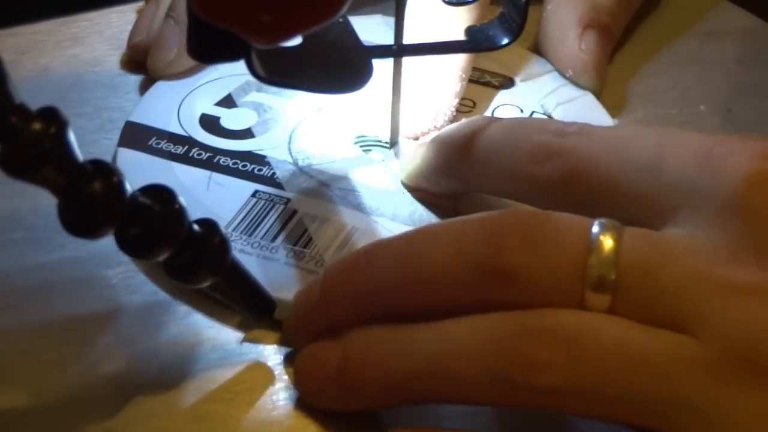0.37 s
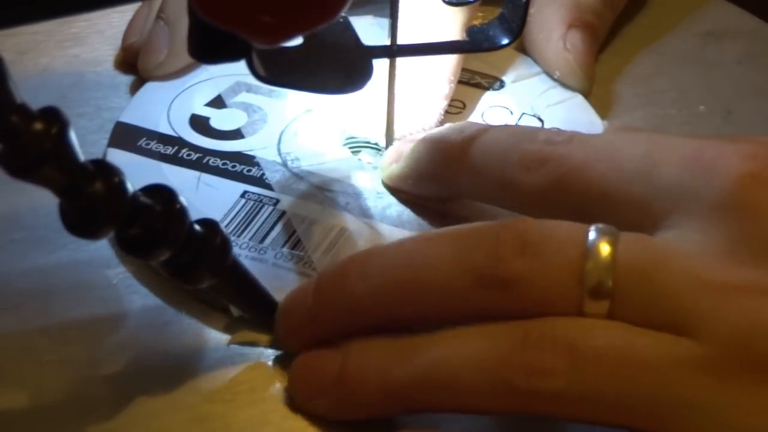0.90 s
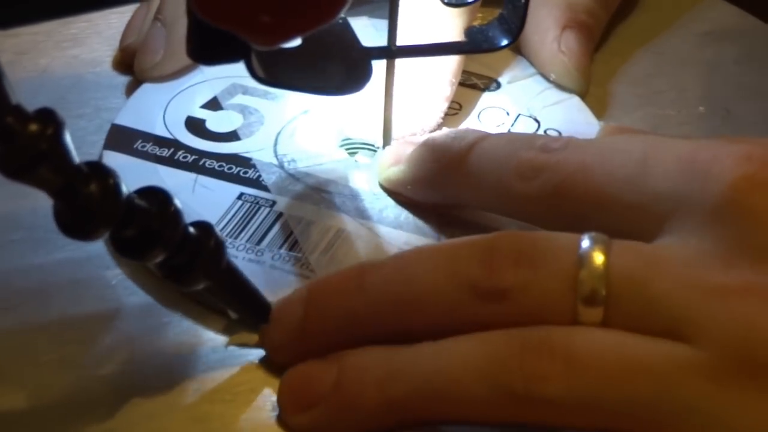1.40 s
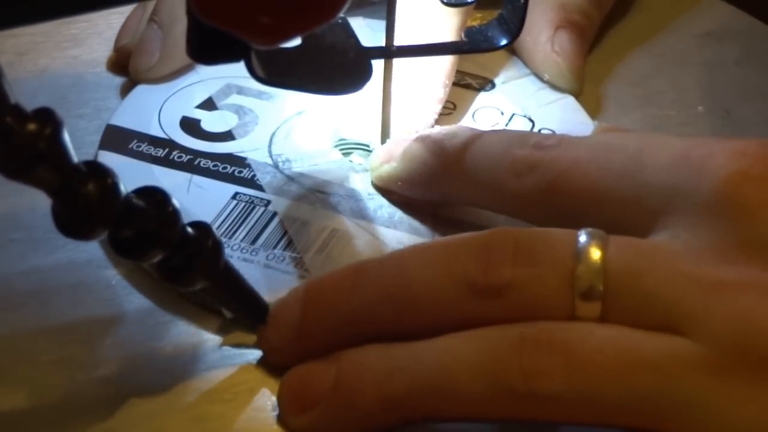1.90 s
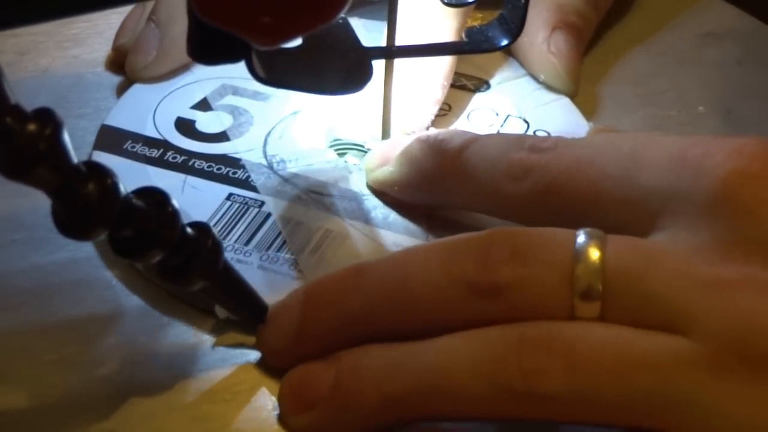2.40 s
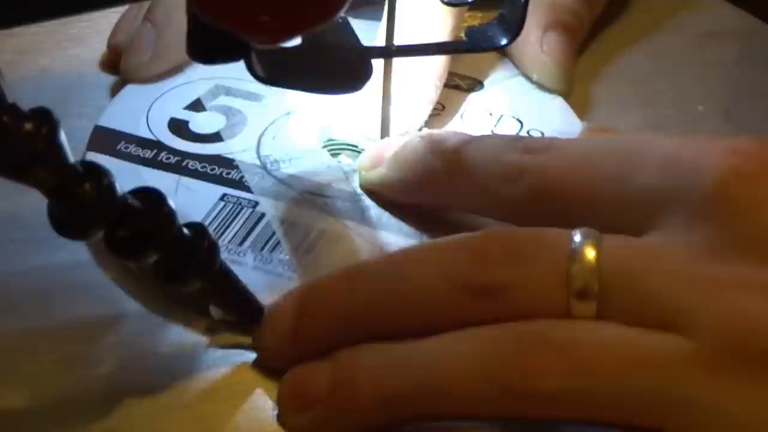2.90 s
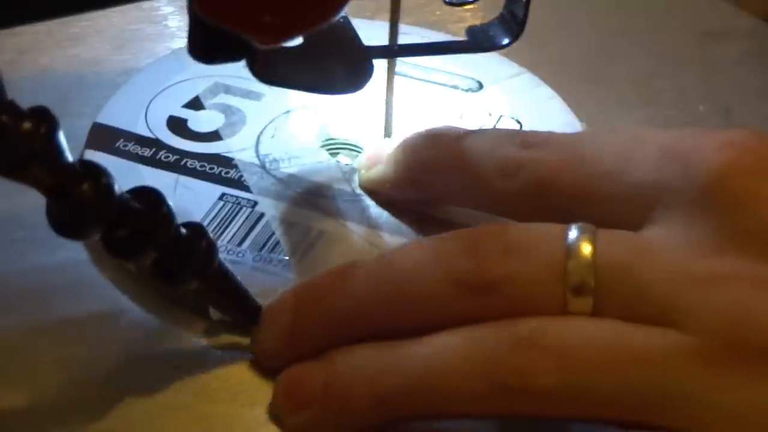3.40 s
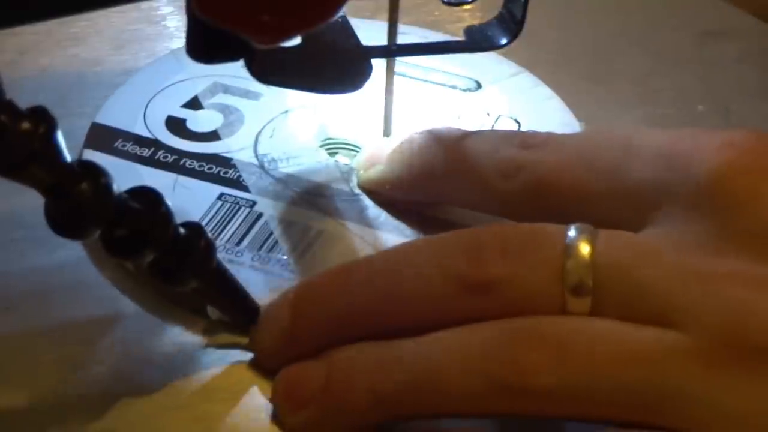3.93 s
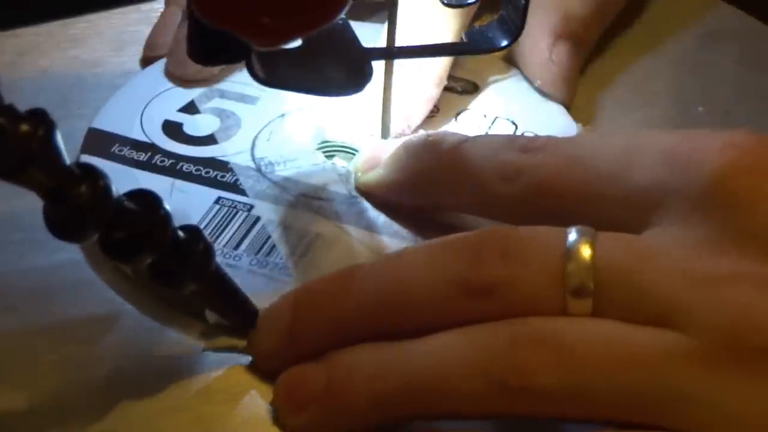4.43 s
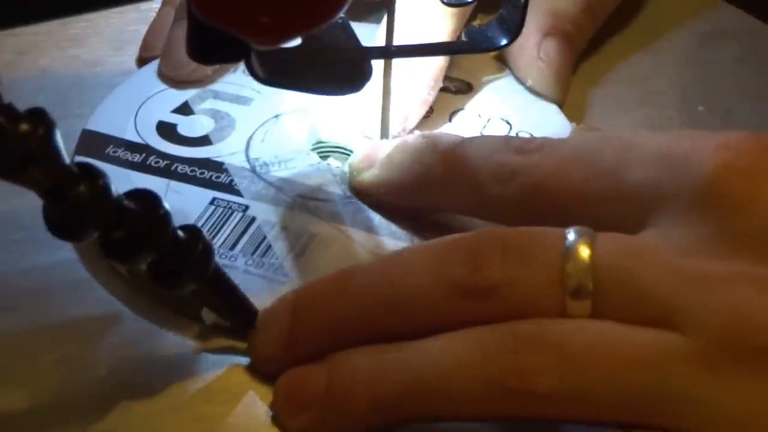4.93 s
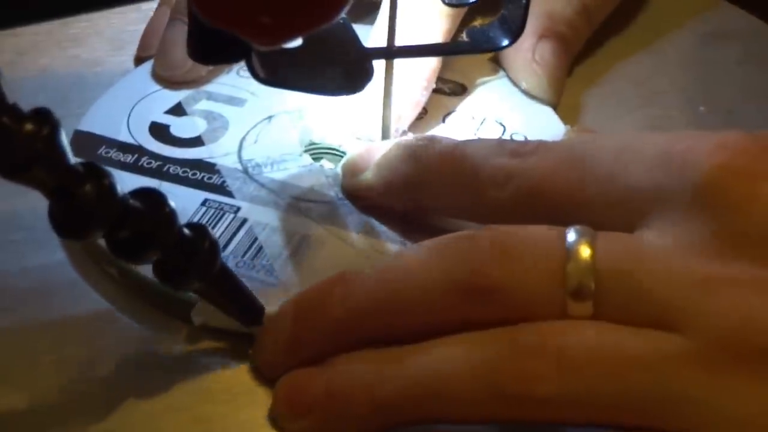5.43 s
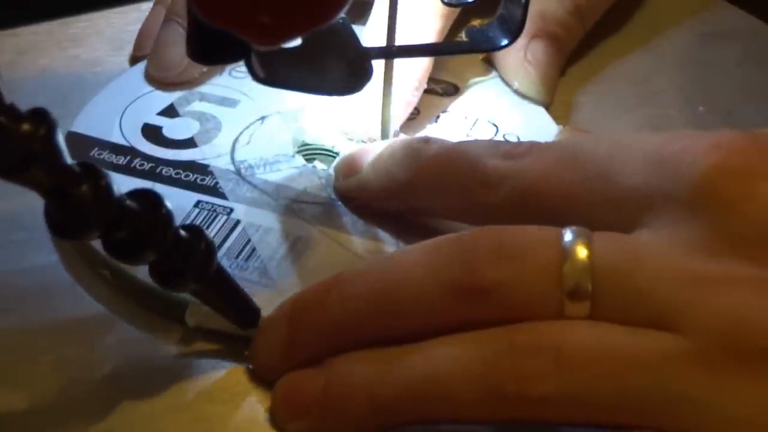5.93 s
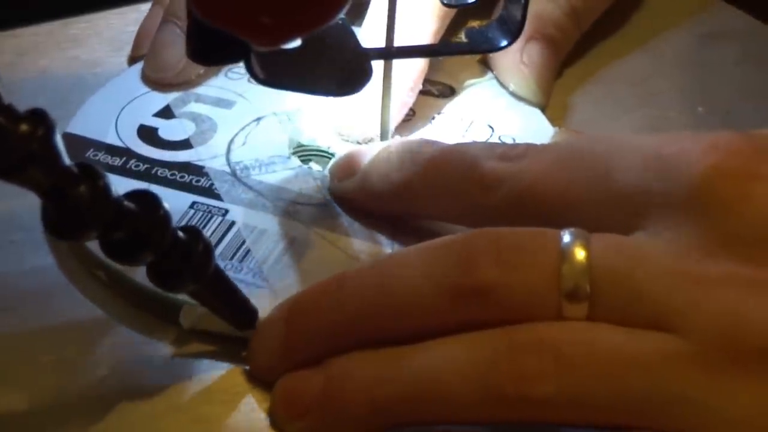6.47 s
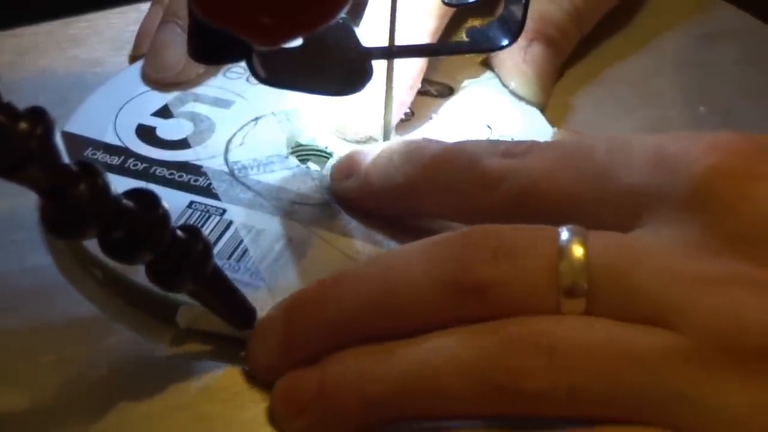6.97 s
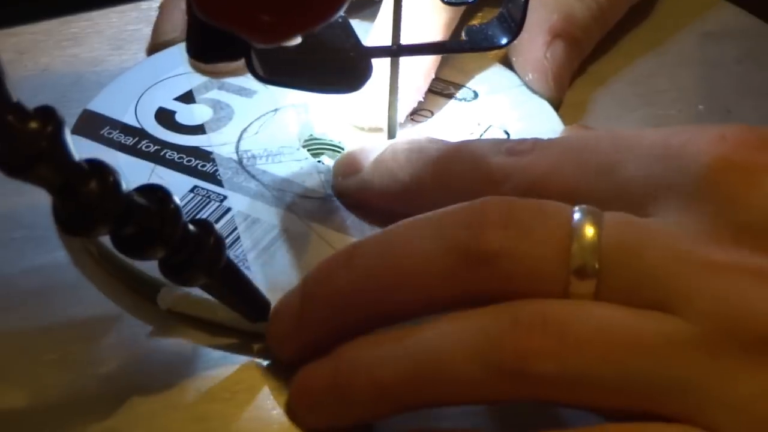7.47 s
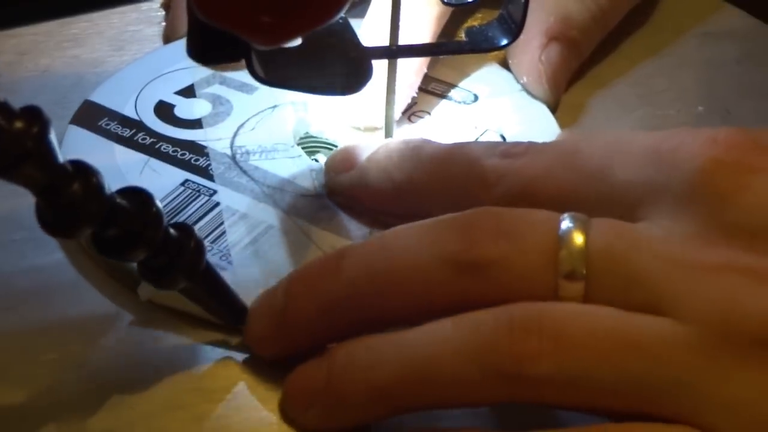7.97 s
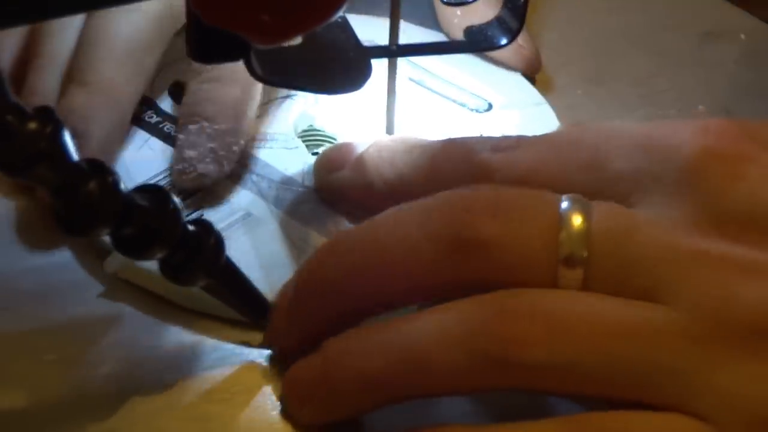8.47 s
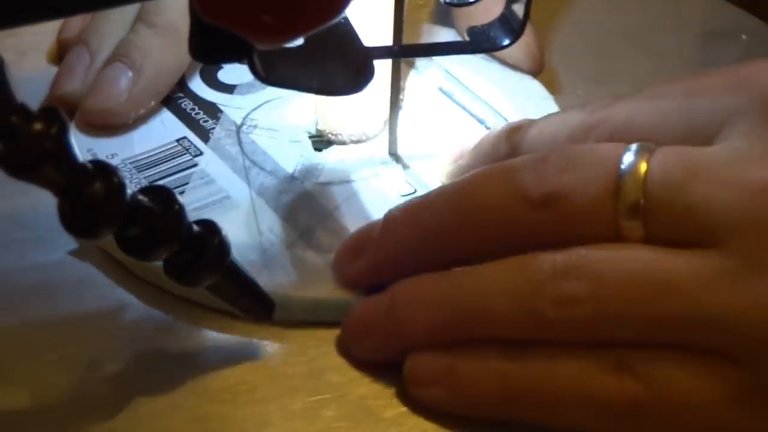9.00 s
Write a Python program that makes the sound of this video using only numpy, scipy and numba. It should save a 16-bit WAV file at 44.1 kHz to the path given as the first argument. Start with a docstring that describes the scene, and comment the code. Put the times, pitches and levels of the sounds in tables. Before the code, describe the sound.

Heard close and fairly dry, a small motor saw chatters without pause. It grazes a plastic disc softly, then jumps into a loud, gritty, metallic buzz whose ringing tone wavers as the disc turns. Near the end it snags in a quick crackle, falls quieter, cuts again unevenly with scattered high snaps, then dips and rises into a raspy hiss. Short small-room reflections surround it.

```python
"""Bench saw cutting a thin disc

A small bench saw, heard close by in a small workshop, runs at about fifty strokes a second
while a thin plastic disc is fed into its blade. The drive knocks once a stroke; the teeth bite in two
bursts a stroke, as noisy contacts that ring the frame, blade and disc through resonances.
When the blade snags, the disc face snaps in short dying tones.
A fixed electric whine of sine tones and a weak bench rumble of shaped noise lie below."""
import sys
import numpy as np
from scipy import signal
from scipy.fft import rfft, irfft, next_fast_len
from scipy.io import wavfile
from scipy.ndimage import uniform_filter1d
from numba import njit

SR = 44100
rng = np.random.default_rng(int(sys.argv[2]) if len(sys.argv) > 2 else 0)


def master_out(mix):
    """Clip the mix to full scale and print it as 16-bit PCM to the path in sys.argv[1]."""
    frames = np.transpose(np.atleast_2d(mix))
    ceiling = np.clip(frames, -1, 1)
    pcm = np.round(ceiling * 32767).astype(np.int16)
    wavfile.write(sys.argv[1], SR, pcm)


def ratio_of_db(decibels):
    """Turn decibels (scalar or array-like) into linear amplitude factors; 0 dB maps to 1."""
    return 10 ** (np.asarray(decibels, float) / 20)


N = 401751

# Speed of the drive: time_s, strokes_per_s
SPEED = [(0.0, 50.9), (0.1, 51.4), (1.83, 50.6), (2.2, 49.7), (2.31, 50.5), (3.04, 50.3), (3.58, 51.2),
         (3.74, 48.9), (4.34, 49.6), (5.2, 48.3), (6.27, 49.0), (6.98, 48.8), (7.18, 49.9), (8.25, 48.7),
         (8.35, 49.1), (8.91, 47.2), (9.06, 48.0), (9.11, 47.1)]
# The cut: the disc grazes the blade, is fed in, backed off and fed again:
# time_s, bite_db (tooth hiss), flexing_db (disc's flexing ring), blade_db (blade's ring), face_db (disc face's ring)
FEED = [(0, -55, -56, -59.5, -61), (0.135, -56.5, -56, -57, -61), (0.165, -47.5, -50, -57, -55),
        (0.22, -55, -57, -55, -60), (0.3, -50.5, -51, -57.0, -58), (0.38, -47, -54, -54, -53),
        (0.42, -51.5, -53, -56, -60), (0.55, -53, -53, -53.5, -59), (0.684, -52, -52, -56, -58),
        (0.691, -42, -53.5, -40.5, -42.5), (0.95, -40.5, -48, -38, -41.5), (1.5, -42, -47, -43, -38.5),
        (1.9, -42.5, -42.5, -39.5, -41.5), (2.3, -41, -44.5, -42.5, -40), (2.6, -43, -41.5, -42.5, -40.5),
        (3.05, -42, -41.5, -42.5, -40.5), (3.3, -43, -43.5, -39, -37.5), (3.5, -44.5, -41.5, -46, -34.5),
        (3.75, -43.5, -47, -44.5, -35.5), (4.2, -43.5, -46, -46, -34), (4.5, -42, -47.5, -43, -36.5),
        (4.7, -42, -40.5, -43.5, -39.5), (5.2, -43, -41, -40.5, -41), (5.85, -43.5, -41.5, -41, -42.0),
        (6.15, -42.5, -50.5, -42, -40.5), (6.7, -44, -51.5, -48, -41.5), (7.0, -42, -44, -43.5, -42.5),
        (7.1, -45.5, -51, -44, -35.5), (7.16, -56, -55, -57, -61), (7.35, -55.5, -59, -52, -58),
        (7.45, -51.5, -46.5, -48, -47), (7.7, -50, -53, -49.5, -44), (8.1, -47.5, -52, -49.5, -45.5),
        (8.17, -42.5, -50.5, -50, -43.5), (8.3, -48.5, -54, -50, -43), (8.42, -49, -51, -52.5, -56.5),
        (8.62, -42.5, -49, -51.5, -44), (8.85, -41, -51.5, -52, -44.5), (9.11, -39.5, -48, -45.5, -47)]
# Tooth bursts within one stroke: start_strokes, level_db, fade_strokes
BITES = [(.05, 0, .16), (.55, -1.5, .15)]
USUAL_DB = -42   # level about which the sounds follow the cut


def rms_one(x):
    """Scales a signal to an rms of 1."""
    return x / np.sqrt(np.mean(x ** 2) + 1e-20)


def in_time(rows):
    """Draws every column of a table as a line over time; the first column is time_s."""
    s, *columns = np.transpose(rows)
    return [np.interp(np.arange(N) / SR, s, column) for column in columns]


def colour(x, points):
    """Shapes the spectrum of a signal by (Hz, dB) points, straight lines over log frequency."""
    size = next_fast_len(N)
    hz = np.maximum(np.arange(size // 2 + 1) * SR / size, 1)
    points_hz, points_db = np.transpose(points)
    db = np.interp(np.log(hz), np.log(points_hz), points_db)
    return irfft(rfft(x, size) * ratio_of_db(db), size)[..., :N]


def drift(rate):
    """Slow chance of spread 1: noise through two equal low-pass poles at rate Hz."""
    r = np.exp(-80 * np.pi * rate / SR)   # one step every 40 samples
    noise = rng.standard_normal(N // 40 + 2002)
    slow = signal.lfilter([1], [1, -2 * r, r * r], noise)[2000:]
    return np.interp(np.arange(N) / 40, np.arange(len(slow)), rms_one(slow))


def resonance(x, hz, width_hz):
    """Two-pole resonance, gain 1 on top."""
    r = np.exp(-np.pi * width_hz / SR)
    poles = [1, -2 * r * np.cos(2 * np.pi * hz / SR), r * r]
    return signal.lfilter(np.array([1, 0, -1]) * (1 - r * r) / 2, poles, x)


@njit
def gliding(x, twice_cos, r):
    """Two-pole resonance whose centre and width move."""
    y = np.zeros(len(x))
    for i in range(2, len(x)):
        driven = (1 - r[i] ** 2) / 2 * (x[i] - x[i - 2])
        y[i] = driven + r[i] * twice_cos[i] * y[i - 1] - r[i] ** 2 * y[i - 2]
    return y


def grains(shape, spread_db):
    """Dense clicks of uneven size and random sign."""
    sizes = ratio_of_db(spread_db * np.minimum(rng.exponential(1, shape), 5))
    return rms_one(sizes * rng.standard_normal(shape))


def strokes(wobble):
    """Running count of blade strokes, slightly uneven."""
    return np.cumsum(in_time(SPEED)[0] * (1 + wobble * drift(8.07))) / SR


def rumble():
    """Lumpy low shaking of the bench: shaped noise, stronger as the teeth bite."""
    # Spectrum of the bench: pitch_hz, relative level_db
    bench = [(15, -40), (25, -6.5), (173, -4), (266, 1.5), (293, -20), (316, -46), (330, 9), (430, -10),
             (730, -120)]
    level_db, share_of_bite_swing = -74.5, 0.75
    swing_db = share_of_bite_swing * (in_time(FEED)[0] - USUAL_DB)
    lumps = ratio_of_db(level_db + swing_db + 2.8 * drift(7.6))
    return rms_one(colour(rng.standard_normal(N), bench)) * lumps


def whine():
    """Fixed electric tones of the speed control, with slight wavers of level and phase."""
    # Tones about which the level wavers: pitch_hz, rms level_db
    tones = [(399.5, -70.5), (1199, -58.5), (1598, -55), (1997, -68)]
    t = np.arange(N) / SR
    out = 0
    for hz, db in tones:
        tone = np.sin(2 * np.pi * hz * t + .5 * drift(1.24))
        out = out + np.sqrt(2) * ratio_of_db(db + 0.21 * drift(5.8)) * tone
    return out


def drive(turn):
    """One clean knock a stroke over a rattle; the housing lifts harmonics that slide onto its resonances."""
    # Knock: time_s, level_db before the trim below
    knock = [(0.0, -59), (0.1, -57.5), (1.09, -59), (6.49, -55), (6.83, -51), (7.33, -58), (7.48, -53.5),
             (8.96, -52), (9.01, -49.5), (9.11, -56)]
    # Spectrum of knock and rattle: pitch_hz, relative level_db
    knock_colour = [(150, -60), (250, -33), (310, -12.5), (390, -3.5), (520, -4), (650, -0.5), (800, -1),
                    (1000, -12), (1400, -8), (1900, -51)]
    # Housing resonances: pitch_hz, width_hz, share of the lift (0-1)
    housing = [(438, 13, 0.63), (537, 19, 1.0)]
    # How strongly the housing sings along: time_s, lift_db
    lift = [(0, -7), (3.5, -7), (3.8, 15), (5.8, 9), (6.2, 14), (7.1, 17), (7.2, 8), (7.4, 10), (7.5, 16.5),
            (9.11, 18)]
    trim_db, waver_db = -1, 1.6   # waver: each harmonic on its own
    rattle_usual_db, share_of_bite_swing = -62, 0.6
    lag = .75   # higher harmonics arrive first

    speed, lift_db = in_time(SPEED)[0], in_time(lift)[0]
    pulses = 0
    for k in range(5, 30):
        near = sum(share / (1 + ((k * speed - hz) / (width / 2)) ** 2) for hz, width, share in housing)
        harmonic = np.cos(2 * np.pi * k * (turn + lag * k / 100))
        pulses = pulses + ratio_of_db(near * lift_db + waver_db * drift(1.9)) * harmonic
    rattle = rng.standard_normal(N) * (1.7 + np.exp(-(turn % 1) / 0.035))   # strongest as a stroke begins
    pulses, rattle = colour(np.array([pulses, rattle]), knock_colour)
    pulses = pulses / np.sqrt(uniform_filter1d(pulses ** 2, size=9000))   # even running level
    knock_db = in_time(knock)[0] + trim_db
    rattle_db = rattle_usual_db + share_of_bite_swing * (in_time(FEED)[0] - USUAL_DB)
    return ratio_of_db(knock_db) * pulses + ratio_of_db(rattle_db) * rms_one(rattle)


def snaps():
    """The blade snags and the disc face snaps: a slightly noisy tone swells fast and dies away."""
    # Snaps: start_s, level_db before the trim, swell and fade below, pitch_hz
    snags = [(7.0145, -23, 5400), (7.0344, -23, 5330), (7.0544, -23, 5330), (7.0753, -23, 5300),
             (7.0953, -27, 4860), (7.4374, -30, 5470), (7.5103, -35, 5300), (7.5502, -26, 5200),
             (7.5906, -24, 5360), (7.6914, -27, 5400), (7.7328, -25, 5370), (7.7528, -27, 5420),
             (7.7727, -30, 5370), (7.8136, -32, 5560), (7.9049, -29, 5220), (7.9354, -25, 5370),
             (8.0162, -27, 5450), (8.1389, -29, 5200), (8.1794, -28, 5400), (8.1924, -27, 5570),
             (8.2432, -28, 5300)]
    trim_db, t60_s, swell_s = -2, .02, .0008
    out, t = np.zeros(N), np.arange(SR // 30) / SR
    for s, db, hz in snags:
        ring = np.sin(2 * np.pi * hz * t) + 0.14 * rng.standard_normal(len(t))
        envelope = ratio_of_db(db + trim_db - 60 * t / t60_s) * (1 - np.exp(-t / swell_s))
        out[int(s * SR):][:len(t)] += envelope * ring
    return out


def bursts(turn, force_db, depth_db, second_db=0):
    """Loudness along the stroke: each bite starts fast and fades above a floor of depth_db."""
    gate = ratio_of_db(depth_db)
    for k, (start, db, fade) in enumerate(BITES):
        since = turn + 1 - start
        phase = since % 1
        force = force_db[since.astype(int) % len(force_db), k]
        rise = 1 - np.exp(-phase / .02)
        gate = gate + ratio_of_db(db + k * second_db + force) * rise * np.exp(-phase / fade)
    return gate


def teeth(turn, depth_db, uneven_db):
    """Tooth contacts: a pattern that returns on every stroke and slowly wears away, and fresh grit."""
    # Loosely held, the disc is bitten mainly once a stroke: time_s, change of the second bite_db
    loose = [(0, -10), (.68, -11), (.7, -4.5), (6.9, -2.5), (7.0, -17), (7.12, -20), (7.2, -5), (8.4, -1),
             (8.6, -15), (9.11, -33)]
    kept = .97   # share of the tooth pattern left after one stroke
    first_slap, second_slap = .6, .34   # slap against the tooth pattern; second slap against the first
    count, steps = int(turn[-1]) + 2, 880   # steps per stroke

    contacts = grains((count + 60, steps), spread_db=1.5)
    pattern = signal.lfilter([1], [1, -kept], contacts, axis=0)[60:]
    even_force = np.zeros((1, len(BITES)))
    pattern = rfft(pattern * bursts(np.arange(steps) / steps, even_force, depth_db))
    order = np.arange(steps // 2 + 1)
    # The first tooth slaps the disc, highs trailing, and again half a stroke later
    slap = np.exp(-2j * np.pi * order * (BITES[0][0] + order / 4000)) * (1 + second_slap * (-1) ** order)
    pattern = pattern / np.mean(np.abs(pattern)) + first_slap * slap
    pattern = irfft(pattern / np.abs(pattern) ** .8, steps)   # short contacts feed all harmonics nearly alike
    returning = np.interp(turn * steps, np.arange(pattern.size), pattern.ravel())

    force_db = uneven_db * rng.standard_normal((count, len(BITES)))
    wander = 0.025 * drift(4.8)   # the bite point moves along the stroke
    gate = bursts(turn + wander, force_db, depth_db, in_time(loose)[0])
    fresh = gate * grains((2, N), spread_db=1.6)   # two independent rows
    return rms_one(returning), rms_one(fresh)


def ringing(push, other, low, high, between_db):
    """One part's band: push rings its modes, other teeth feed the flat sound between them."""
    # Fixed modes: pitch_hz, width_hz, level_db (relative within a part)
    modes = [(1290, 400, -12), (1375, 40, -11), (2004, 50, -4), (2222, 50, -6), (2340, 65, -1),
             (2912, 120, -5), (3012, 60, -8), (3306, 40, -3), (3440, 40, -1), (3892, 60, -4),
             (4314, 50, -5), (4955, 60, -9), (5150, 70, -6), (5365, 80, -4), (7125, 130, -16),
             (7565, 170, -10), (8355, 280, -11), (9900, 1800, -18), (14800, 2500, -15)]
    # The disc is let go and rings more freely: pitch_hz, width_hz, relative level_db, start_s
    freed = [(3000, 170, 7, 8.82), (8480, 250, 4, 8.58), (10800, 450, 4, 8.6), (13100, 500, 6, 8.75),
             (13900, 350, 4, 8.62)]
    # The disc's two main rings move as it turns under the fingers; widths are those of one pass of two:
    # time_s, flexing_hz, face_hz, flexing_width_hz, face_width_hz
    disc = [(0.0, 1666, 5500, 90, 500), (.7, 1670, 5450, 60, 380), (1.09, 1677, 5390, 45, 380),
            (3.07, 1660, 5510, 40, 380), (3.5, 1669, 5450, 75, 380), (3.8, 1623, 5380, 75, 500),
            (5.38, 1630, 5650, 80, 380), (6.1, 1635, 5500, 70, 350), (6.6, 1645, 5380, 70, 350),
            (7.0, 1655, 5300, 70, 380), (7.23, 1659, 5370, 70, 480), (8.3, 1665, 5350, 70, 520),
            (8.65, 1665, 6050, 80, 600), (9.11, 1650, 5400, 80, 600)]
    disc_db, freed_rise_s = 4, .06

    own = [mode for mode in modes if low <= mode[0] < high]
    top_db = max([db for hz, width, db in own], default=0)
    rung = ratio_of_db(between_db) * other
    for hz, width, db in own:
        rung = rung + ratio_of_db(db - top_db) * resonance(push, hz, width)
    for hz, width, db, s in freed:
        if low <= hz < high:
            rise = np.clip((np.arange(N) / SR - s) / freed_rise_s, 0, 1)
            rung = rung + ratio_of_db(db) * rise * resonance(push, hz, width)
    flexing_hz, face_hz, flexing_width, face_width = in_time(disc)
    for hz, width in [(flexing_hz, flexing_width), (face_hz, face_width)]:
        if low <= hz[0] < high:
            ring = 2 * np.cos(2 * np.pi * hz / SR), np.exp(-np.pi * width / SR)
            rung = rung + ratio_of_db(disc_db) * gliding(gliding(push, *ring), *ring)   # twice for steep flanks
    return signal.sosfilt(signal.butter(4, [low, high], "band", fs=SR, output="sos"), rung)


def cutting(turn):
    """Each part rings at its modes, at its own moment of the stroke; hands and feed set how loudly."""
    # Where one part gives way to the next: edge_hz
    edges = [850, 1500, 1850, 2650, 3150, 3700, 4700, 6100, 9200, 17000]
    # Parts: share repeating from stroke to stroke (0-1, before the steadiness below),
    # between_db (flat sound between modes, before gaps and dulling), lateness in fiftieths of a second
    parts = [(0.57, -4.5, 0.016), (0.75, -8.5, 0.1753), (0.31, -10.5, .05), (0.4, -6, .3), (0.7, -14, 0.27),
             (0.26, -5.5, 0.18), (0.34, 2, 0.15), (0.27, -5, 0.093), (0, 4.5, 0.0081)]
    # Table, disc flexing, frame, arm, blade, blade guide, disc face, chips, tooth hiss:
    # usual level_db, share of the bite's swing, share of the swing of the ring it is tied to
    levels = [(-50.5, 0.11, 0.44), (-40.5, .01, 1.01), (-44, 0.068, 0.27), (-43, 0.75, 0.42),
              (-42, .01, 1.2), (-42, 0.48, 0.49), (-42, .01, 0.8), (-43, 0.64, 0.47), (-42, 1.0, .01)]
    # Ring each part is tied to: 0 flexing, 1 blade, 2 face
    tied_to = [0, 0, 1, 0, 1, 1, 2, 2, 2]
    # Late in the work the gaps between the modes darken, and fill whenever the disc backs off or scrapes:
    # time_s, change_db
    gaps = [(0, 0), (5.8, 0), (6.2, -8), (7.1, -8), (7.14, 8), (7.37, 6), (7.42, -8), (8.3, -8), (8.34, 6),
            (8.6, 3), (9.11, 2)]
    # Share of that change, part by part (0-1)
    gaps_share = [.1, .1, .1, .1, .1, .5, 1, .5, .1]
    # The tooth hiss thins below its top: time_s, change_db
    dull = [(0, -6), (3.1, 3), (3.5, -6), (4.4, -9), (4.7, -5), (6, -7), (6.3, 2), (8.4, -11), (8.6, 0),
            (9.11, -6)]
    steady_at_db, steady_loss_per_db, least_steady = -38, .06, .45
    flicker_db, flicker_hz = 1.0, 4.9   # each part wavers on its own

    returning, fresh = teeth(turn, depth_db=-12, uneven_db=.7)
    bite_db, *rings_db = in_time(FEED)
    gaps_db, dull_db = in_time(gaps)[0], in_time(dull)[0]
    # Strokes repeat best while the blade rings loudly
    steady = np.clip(1.5 - steady_loss_per_db * (steady_at_db - rings_db[1]), least_steady, 1)
    out = 0
    for k, (low, high) in enumerate(zip(edges, edges[1:])):
        share, between_db, late = parts[k]
        usual_db, on_bite, on_ring = levels[k]
        share = np.clip(share * steady, 0, 1)
        both = np.sqrt(share) * returning + np.sqrt(1 - share) * fresh
        both = np.roll(both, int(late * SR / 50), axis=1)
        push, other = both[[k % 2, 1 - k % 2]]   # neighbouring parts swap the two rows
        between_db = between_db + gaps_share[k] * gaps_db
        if high == edges[-1]:   # the tooth hiss
            between_db = between_db + dull_db
        band = ringing(push, other, low, high, between_db)
        band = band / np.sqrt(uniform_filter1d(band ** 2, size=9000))   # even running level
        bite_swing_db = on_bite * (bite_db - USUAL_DB)
        ring_swing_db = on_ring * (rings_db[tied_to[k]] - USUAL_DB)
        out = out + ratio_of_db(usual_db + bite_swing_db + ring_swing_db + flicker_db * drift(flicker_hz)) * band
    return out


def workshop(x, t60_s):
    """Diffuse reflections of the room: noise that dies away, convolved."""
    t = np.arange(SR // 2) / SR
    tail = rng.standard_normal(len(t)) * ratio_of_db(-60 * t / t60_s) * (t > .002)
    return signal.fftconvolve(x, tail / np.sqrt(np.sum(tail ** 2)))[:N]


def scene():
    """The saw sits in the middle; left and right differ by their reflections."""
    # Spectrum of the side reflections against the saw: pitch_hz, level_db
    side_colour = [(60, -10), (200, -8.5), (380, -16), (700, -16.5), (1290, -24.5), (2380, -20),
                   (4400, -16.5), (8120, -10.5), (15000, -11.5)]
    turn = strokes(wobble=.0007)
    saw = rumble() + whine() + drive(turn) + snaps() + cutting(turn)
    middle = saw + ratio_of_db(-17) * workshop(saw, t60_s=.15)
    side = colour(workshop(saw, t60_s=.3), side_colour)
    return np.array([middle + side, middle - side])


def band_limit(x):
    """A steep low-pass at the top of the band."""
    return signal.sosfilt(signal.butter(12, 16390, fs=SR, output="sos"), x)


def record(dry):
    """The top of the sound is cut steeply, 60 dB down from 15950 Hz."""
    cut = signal.sosfilt(signal.cheby2(14, 60, 15950, fs=SR, output="sos"), dry)
    return band_limit(cut)


dry = scene()
out = record(dry)
master_out(out)
```